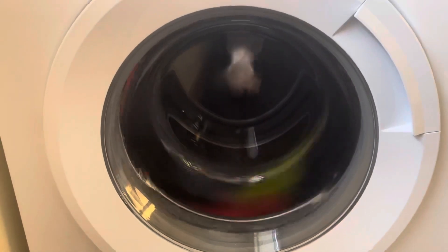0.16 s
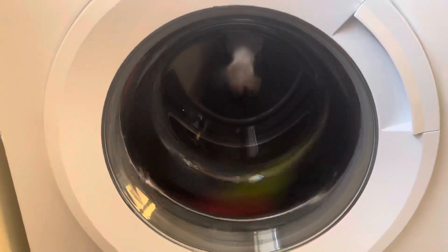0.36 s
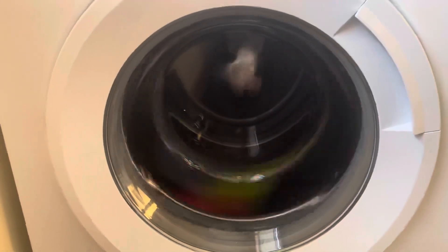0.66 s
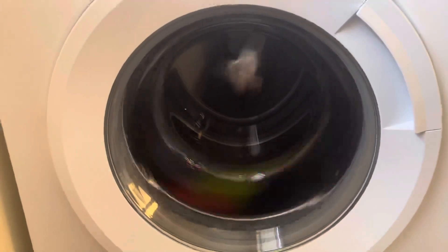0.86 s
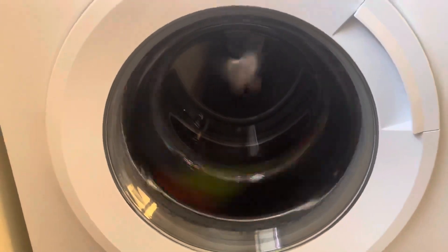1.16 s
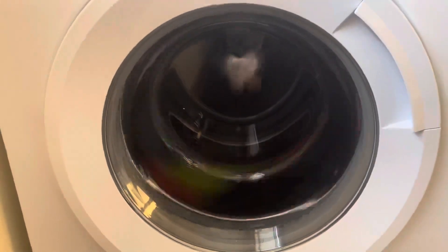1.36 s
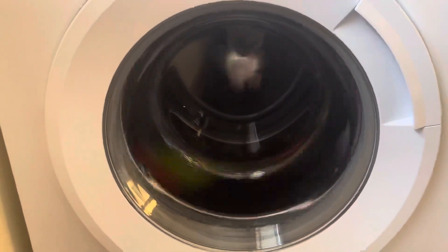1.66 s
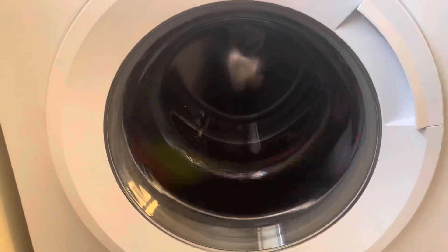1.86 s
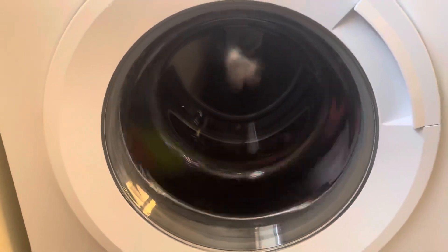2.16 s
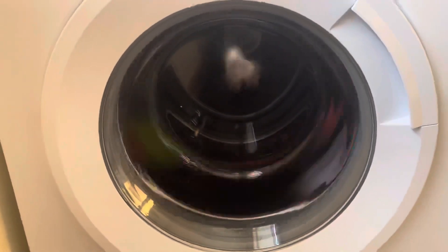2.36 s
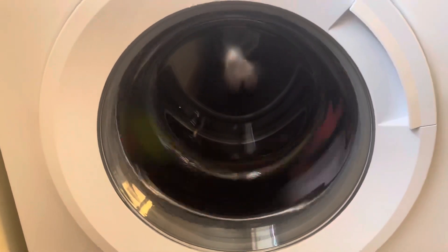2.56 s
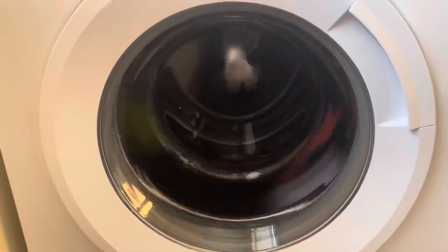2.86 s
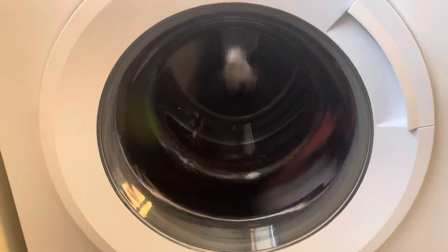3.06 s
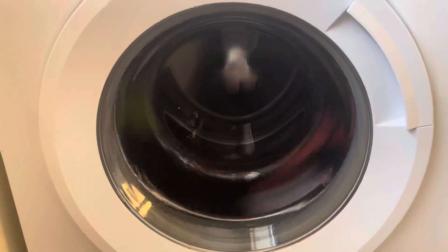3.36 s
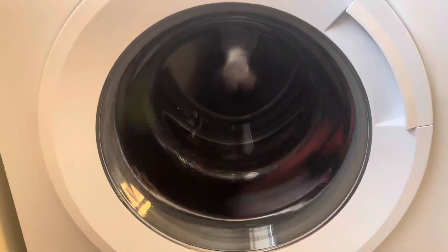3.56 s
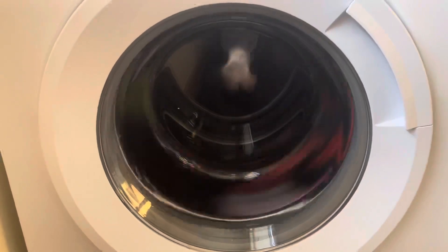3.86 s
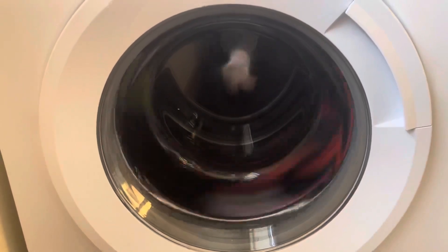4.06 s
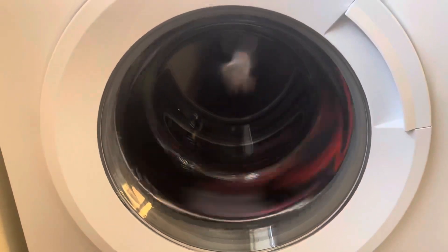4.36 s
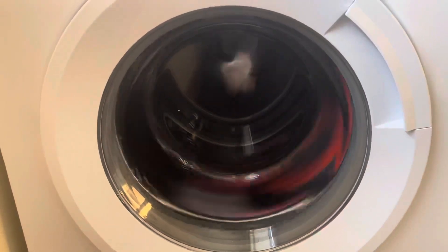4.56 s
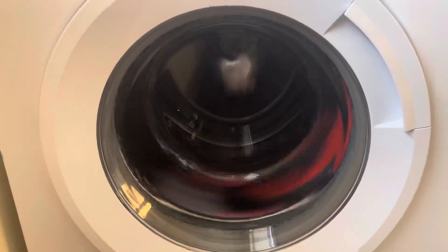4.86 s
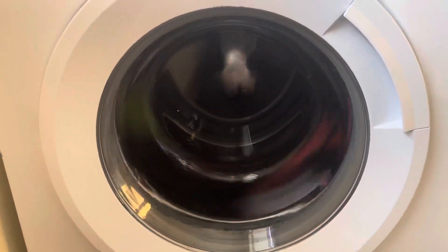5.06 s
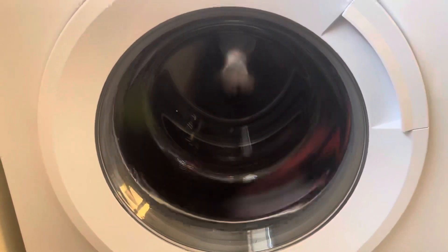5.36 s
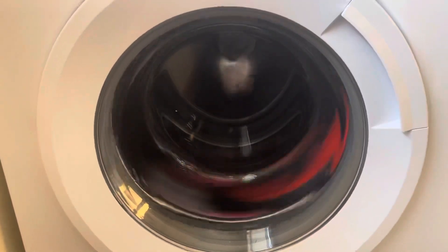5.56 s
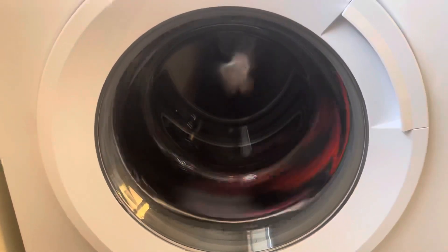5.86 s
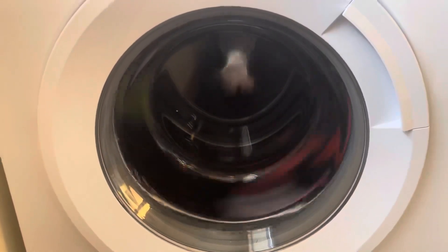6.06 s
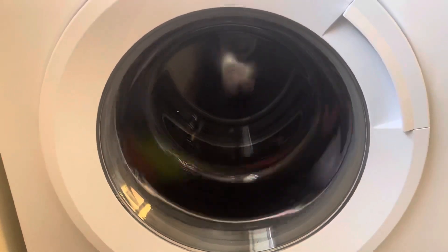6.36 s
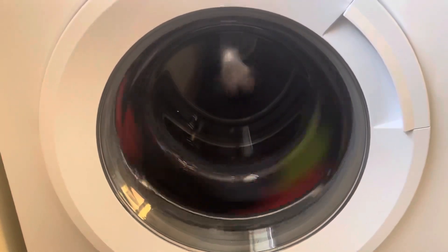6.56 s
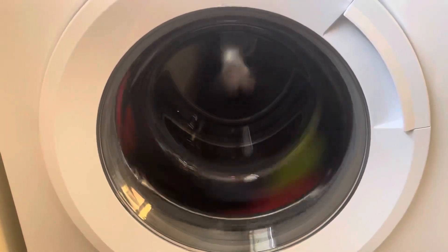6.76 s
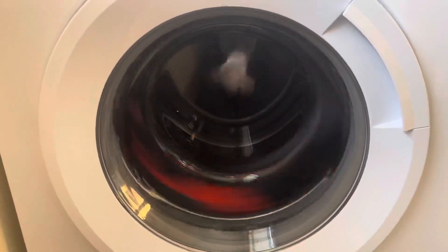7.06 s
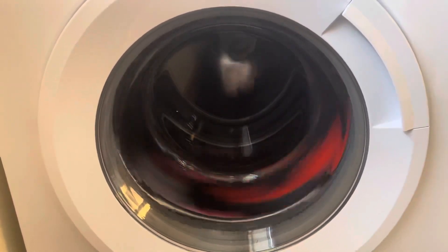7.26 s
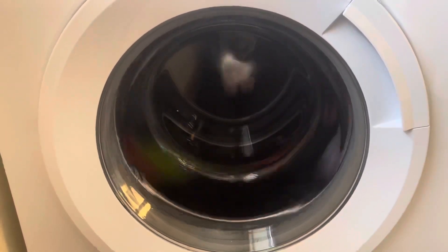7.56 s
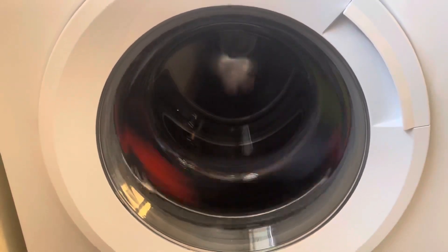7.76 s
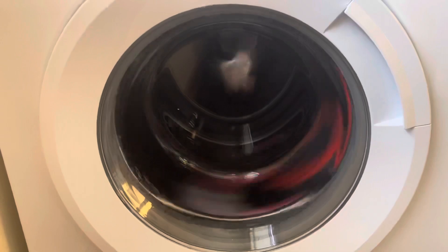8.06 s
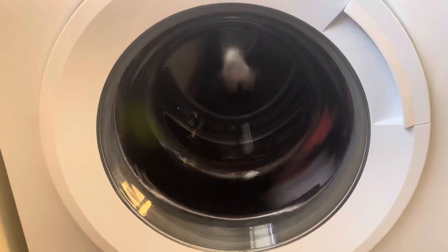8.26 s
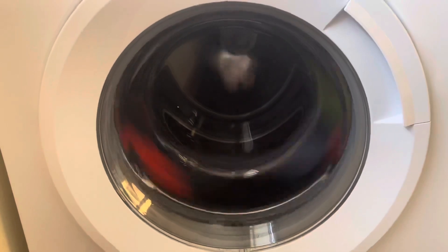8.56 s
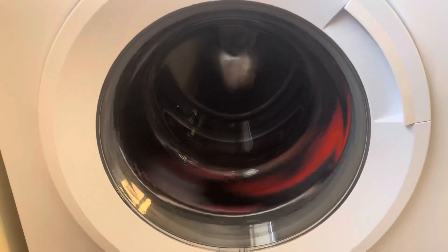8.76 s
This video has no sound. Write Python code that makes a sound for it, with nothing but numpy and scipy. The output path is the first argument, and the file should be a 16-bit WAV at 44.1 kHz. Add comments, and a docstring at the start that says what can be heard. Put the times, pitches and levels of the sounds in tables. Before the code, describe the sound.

Close to a front-loading washing machine in a small room, the drum spins at a steady fast rate with low throbbing hum, thin high motor whine and a rush of air and water. Something loose ticks, scrapes and clatters, most densely around two seconds. After about five seconds the motor eases and the pitch slides down while the hum continues.

```python
"""Washing machine losing spin speed

Heard close to the door of a front loader in a small room: about ten turns a second, then slowing.
The unbalanced drum and whining motor sum wandering tones on multiples of the drum rate; the pump hums
on the mains and rattles as filtered noise; air and water rush as noise that rings the panels.
Mostly in the first half, something loose skitters and clatters: bursts of tiny random clicks."""
import sys
import numpy as np
from scipy import signal
from scipy.fft import rfft, irfft
from scipy.io import wavfile

SR = 44100
rng = np.random.default_rng(int(sys.argv[2]) if len(sys.argv) > 2 else 0)


def store_pcm(level_fs):
    """Save levels as 16-bit WAV."""
    pcm = np.round(np.clip(level_fs, -1, 1) * 32767).astype(np.int16)
    wavfile.write(sys.argv[1], SR, np.atleast_2d(pcm).T)


N = 392931
T = np.arange(N) / SR  # time, s
HZ = np.maximum(np.arange(N // 2 + 1) * SR / N, 1)  # frequencies of the spectrum, Hz

MAINS_HZ = 50.02
BELT_RATIO = 6  # turns of the motor shaft for each turn of the drum
EASES_S, EASING_S = 5.2, .5  # the motor begins to ease off, and takes this long

# colour of the skittering and of the crack of a blow: (frequency [Hz], gain [dB])
CRACKLE_COLOUR = [(80, -36), (400, -7), (1200, 1), (2500, 0.5), (4500, -0.5), (6500, 0), (8500, 1),
                  (11300, 7), (12200, -3.5), (13000, -28)]


def drum(speed, angle, smear=.3, waver_db=1.5, count=58):
    """Every turn the load shoves the tub; springs smear the shove and its higher multiples wander."""
    # shake of the load: (multiple of the drum rate, level before the cabinet lifts it [dB])
    shake = [(3, -62), (4, -54.5), (5, -51.5), (6, -73), (7, -48.5), (8, -50.5), (9, -55.5), (10, -51),
             (11, -54), (12, -47.5), (13, -56.5), (14, -45.5), (15, -58.5), (16, -56.5), (17, -52),
             (18, -55), (21, -61.5), (22, -58), (23, -57), (24, -57.5), (25, -56.5), (26, -65.5), (29, -62),
             (30, -63), (31, -55), (32, -59.5), (33, -56), (35, -57), (37, -64), (41, -66), (42, -59),
             (43, -66), (60, -74)]
    # cabinet resonances that lift the shake as it passes: (frequency [Hz], width [Hz], gain [dB])
    cabinet = [(44.6, 1.4, 7.5), (78.5, 2.6, 4.5), (161, 12.5, -1), (378.4, 5.4, 8.5)]
    multiples, levels_db = np.transpose(shake)
    total = 0
    for k in np.arange(count) + 3:
        # the lift moves slowly: every hundredth sample is enough
        coarse_lift = 1 + np.abs(resonances(cabinet, k * speed[::100]))
        lift = np.interp(T, T[::100], coarse_lift)
        size = undb(np.interp(k, multiples, levels_db) + waver_db * walk(3)) * lift
        wander = (k / 28) ** 2 * walk(2)
        total = total + size * np.cos(k * angle + smear * k ** 2 + wander)
    return np.sqrt(2) * total


def motor(speed, angle, whine_order=350, ripple=0.13):
    """The whine and its multiples flutter with the belt and swell as they slide through resonances."""
    # how well the housing radiates the whine: (frequency [Hz], level [dB])
    housing = [(1690, -82), (1765, -61), (1900, -80), (2700, -76), (2885, -68), (2915, -58), (2960, -57.5),
               (2978, -69), (3010, -55), (3050, -54), (3075, -50), (3115, -50.5), (3140, -54), (3165, -61),
               (3195, -54), (3255, -66), (3280, -55), (3325, -54), (3355, -50), (3390, -49), (3425, -55),
               (3460, -61), (3495, -57), (3530, -57), (4300, -70), (4700, -66), (4900, -73), (5300, -70),
               (5780, -59), (5900, -64), (5950, -58.5), (6000, -63), (6250, -62.5), (6410, -62),
               (6480, -57.5), (6535, -65), (6590, -60), (6690, -67), (6730, -56), (6790, -57), (6850, -63),
               (6900, -56), (7000, -56), (7035, -62.5), (7060, -59.5), (8300, -72), (9700, -70),
               (10150, -68), (10600, -74), (11500, -68), (11720, -61), (11850, -70), (12500, -80),
               (13000, -79), (13600, -95)]
    # tones of the motor: (multiple of the whine, level over the housing's [dB])
    tones = [(.5, 0), (1, 0), (1.5, 0), (2, 0), (3, 0), (4, 0)]
    # side tones while the motor pulls: (multiple of the drum rate, level [dB])
    side_tones = [(330, -66), (356, -61.5)]
    flutter = .22 * walk(28) + .5 * walk(12) + .5 * walk(4)
    phase = whine_order * angle + flutter
    throb = 1 + ripple * np.cos(BELT_RATIO * angle) + ripple * np.cos(4 * np.pi * MAINS_HZ * T)
    whine = 0
    for k, db in tones:
        # the overtones flicker more deeply
        depth = min(k, 2)
        size = undb(db + 1.5 * depth * walk(16) - .5 * depth)
        whine = whine + response(housing, k * whine_order * speed) * size * np.cos(k * phase)
    pulling = 1 - eased() ** 2
    for order, db in side_tones:
        whine = whine + pulling * undb(db + 2 * walk(12)) * np.cos(order * angle + flutter)
    return np.sqrt(2) * whine * throb


def eased():
    """0 while the motor pulls, 1 once it has eased off."""
    return np.clip((T - EASES_S) / EASING_S, 0, 1)


def clatter(room_db=-7, wall_db=-0.5, note_width=0.22, clink_width=0.17):
    """Each blow is a dying flurry of contacts: a bright crack, a hollow wall knock and a thin clink."""
    # blows: (time [s], crack [dB], knock [dB], knock pitch [Hz], clink [dB], clink pitch [Hz], t60 [s])
    blows = [(.002, -41.5, -60, 1600, -49, 8500, 0.22), (.343, -42, -65, 1600, -47, 11300, 0.23),
             (.411, -44, -57, 1600, -50, 6040, 0.18), (.642, -42, -58, 1600, -54, 5500, .12),
             (.870, -39, -41, 1620, -46, 4500, 0.2), (1.021, -29, -55, 1600, -31, 8800, .05),
             (1.033, -36, -57, 1600, -43, 8600, .2), (1.258, -30, -58, 1600, -38, 11600, 0.048),
             (1.272, -38, -50, 1570, -47, 3840, .2), (1.824, -27.5, -31.5, 1706, -34, 3700, 0.2),
             (1.850, -37, -34, 1860, -47, 4000, 0.2), (1.880, -28.5, -29, 1910, -33, 2600, 0.2),
             (1.900, -38, -29.5, 1717, -43, 3700, 0.15), (1.931, -29, -35.5, 1693, -32, 8900, 0.19),
             (1.963, -30.5, -30, 2510, -37, 8000, 0.24), (2.007, -27, -40, 2090, -24, 6400, 0.2),
             (2.021, -26.5, -39, 2100, -29.5, 8500, 0.17), (2.040, -41, -42, 2120, -29, 6660, 0.11),
             (2.075, -34.5, -26, 1598, -44, 3260, 0.29), (2.116, -34.5, -33, 1660, -43, 4900, 0.52),
             (2.215, -27.5, -37.5, 1290, -34.5, 5960, 0.31), (2.292, -41, -30, 1897, -34.5, 5550, 0.29),
             (2.312, -45, -35.5, 2700, -46, 5830, 0.31), (2.459, -35.5, -56, 1610, -44, 5750, 0.26),
             (2.907, -44, -53, 1600, -46, 4200, .18), (3.171, -31, -56, 2210, -35, 11200, 0.37),
             (3.323, -31, -56, 1600, -40, 11300, 0.14), (4.166, -50, -62, 1600, -35, 10800, 0.12),
             (5.153, -44, -65, 1600, -45, 11800, .07)]
    # modes of the drum wall that every blow knocks on: (frequency [Hz], width [Hz], gain [dB])
    wall = [(600, 270, -4), (1210, 250, -7), (1720, 520, 4), (2480, 320, -8), (3350, 280, -23)]
    rise_share = 0.017  # rise time as a share of t60: a longer flurry takes longer to build
    size = SR // 2
    age = T[:size]
    cracks, knocks, notes = np.zeros((3, N))
    for start, crack_db, knock_db, knock_hz, clink_db, clink_hz, t60 in blows:
        rise = 1 - np.exp(-age / (rise_share * t60))
        force = rise * np.exp(-np.log(1000) * age / t60)
        contacts = grains(rate=6000, spread_db=2.5, size=size)
        span = slice(int(start * SR), int(start * SR) + size)
        cracks[span] += force * undb(crack_db) * grains(rate=3500, spread_db=2.5, size=size)
        knocks[span] += force * undb(knock_db + wall_db) * contacts
        # the pitch of the hollow note is set by where the blow lands
        notes[span] += force * undb(knock_db) * swoop(knock_hz, note_width, age)
        notes[span] += force * undb(clink_db) * ringing(contacts, clink_hz, clink_width)
    bright = shape(cracks, unit(response(CRACKLE_COLOUR, HZ)))
    hollow = shape(knocks, unit(resonances(wall, HZ)))
    blows_heard = bright + hollow + notes
    return blows_heard + undb(room_db) * echoes(blows_heard, t60=0.55)


def swoop(hz, width, age, depth=0.303, settle_s=0.00493):
    """A resonance that slides up to its pitch as the contact settles; depth and width are shares of it."""
    pitch = hz * (1 - depth * np.exp(-age / settle_s))
    # slow noise on two axes spreads the tone into a band
    lowpass = signal.butter(2, hz * width / 2, fs=SR, output="sos")
    sway = signal.sosfilt(lowpass, rng.standard_normal((2, len(age))))
    carrier = np.exp(2j * np.pi * np.cumsum(pitch) / SR)
    return unit(np.real((sway[0] + 1j * sway[1]) * carrier))


def ringing(x, hz, width):
    """Ring a broad resonance, width as a share of its centre; rms 1."""
    edges = np.minimum([hz / (1 + width / 2), hz * (1 + width / 2)], .45 * SR)
    return unit(signal.sosfilt(signal.butter(2, edges, "bandpass", fs=SR, output="sos"), x))


def skitter(level_db=2.0, room_db=-6):
    """Something loose slides and scratches, catching unevenly: a dense run of tiny clicks."""
    # slides of the loose thing: (start [s], length [s], level before level_db is added [dB])
    slides = [(0.633, 0.11, -47), (0.74, 0.09, -44), (0.857, 0.2, -43.5), (1.142, 0.19, -45),
              (2.48, .08, -43), (3.154, 0.17, -40.5), (3.978, 0.11, -48.5), (4.142, 0.12, -46.5),
              (4.354, 0.037, -59)]
    catching = undb(1.3 * walk(30))
    size = catching * sum(slide(*row) for row in slides)
    scratch = unit(shape(grains(rate=1500, spread_db=-0.5), response(CRACKLE_COLOUR, HZ)))
    clicks = scratch * size * undb(level_db)
    return clicks + undb(room_db) * echoes(clicks, t60=0.059)


def slide(start, length, db, attack_s=0.0099, release_db_per_s=145):
    """Force of one slide: it grips quickly, holds, then dies away."""
    age = np.maximum(T - start, 0)
    grip = 1 - np.exp(-age / attack_s)
    return grip * undb(db - release_db_per_s * np.maximum(age - length, 0))


def hum(waver_db=1.3, drone_hz=56.5, drone_db=-52.5):
    """The pump hums on mains multiples, rebalanced as the motor eases; a buzz wavers over a low drone."""
    # pump hum: (multiple of the mains, level [dB], change once the motor has eased off [dB])
    hum_lines = [(2, -41, 0.5), (4, -56.5, -9), (5, -57.5, -4.5), (9, -58, -4.5), (12, -57.5, -1),
                 (14, -63, 7), (16, -57, -6), (19, -61, -3), (25, -56.5, -2)]
    # level of the buzz at six times the mains: (time [s], level [dB])
    buzz_level = [(0.0, -44), (2.98, -45.5), (3.15, -57), (3.38, -42), (5.36, -42), (5.44, -46.5),
                  (8.51, -45), (8.91, -54)]
    mains = 2 * np.pi * MAINS_HZ * T
    lines = 0
    for k, db, change_db in hum_lines:
        # the higher lines waver more
        waver = min(1 + k / 8, 2.8) * walk(6)
        size = undb(db + change_db * eased() + waver)
        lines = lines + size * np.cos(round(k) * mains + .03 * k * walk(6))
    buzz_size = undb(curve(buzz_level) + waver_db * walk(14))
    buzz = buzz_size * np.cos(6 * mains + .25 * walk(9))
    drone = undb(drone_db) * np.cos(2 * np.pi * drone_hz * T)
    return np.sqrt(2) * (lines + buzz + drone)


def rattle(angle, level_db=-54.0, throb=0.37):
    """Brief gulps of air in the impeller rattle the pump housing, which throbs with the motor shaft."""
    # rattle of the pump housing: (frequency [Hz], width [Hz], gain [dB])
    housing_modes = [(2637, 52, 8.5), (3233, 250, 6.5), (4130, 110, 1.5)]
    gulp = np.exp(-T[:SR // 50] / .0025)  # dies away over a few milliseconds
    force = signal.fftconvolve(np.abs(grains(rate=260, spread_db=1.2)), gulp)[:N]
    force = force * (1 + throb * np.cos(BELT_RATIO * angle))
    noise = force * rng.standard_normal(N)
    return undb(level_db) * unit(shape(noise, resonances(housing_modes, HZ)))


def rush(speed, angle, pulsing=0.056, lurch=0.018):
    """The tub rumbles; air and water hiss, pulsing at twice the mains and each turn; panels ring to all."""
    # rumble of the tub: (frequency [Hz], level in 1 Hz before the panels [dB])
    rumble_colour = [(24, -102), (46, -78), (64, -64.5), (80, -63), (110, -55.5), (138, -66), (200, -65.5),
                     (280, -63), (320, -63.5), (378, -63), (415, -74), (560, -73), (700, -75.5),
                     (1200, -78), (1600, -92.5), (4000, -110)]
    # hiss of air and water: (frequency [Hz], level in 1 Hz before flow and panels [dB])
    hiss_colour = [(500, -90), (1100, -80.5), (1550, -83.5), (2150, -82), (2850, -87), (3250, -81.5),
                   (3800, -89), (5000, -96), (6800, -96.5), (7500, -98), (9000, -98.5), (11200, -91.5),
                   (12000, -100.5), (12800, -120)]
    # water flung on the tub wall: (frequency [Hz], width [Hz], level in 1 Hz before flow and panels [dB])
    wash_modes = [(1527, 390, -83.5), (3510, 90, -93)]
    # resonances of the steel panels, over the plain rush: (frequency [Hz], width [Hz], gain [dB])
    panel_modes = [(355.3, 6.6, 3), (381.3, 6.2, 3.5), (459, 17, 4.5), (524.5, 14, 5.5), (581, 12.6, 7),
                   (620, 21, -7), (686, 19, 7), (734, 12, -4), (783, 15, 6.5), (936, 22, 3.5),
                   (1078, 62, 5), (1184, 60, 0), (1383, 14, 2.5), (1488, 26, 5), (1540, 17, 4.5),
                   (1673, 18, 5.5), (2006, 76, 0.5), (2683, 41, 5)]
    white = rng.standard_normal((3, N)) * np.sqrt(SR / 2)
    flow_db = flow(speed)
    rumble = shape(white[0], response(rumble_colour, HZ)) * undb(0.82 * walk(12))
    hiss = shape(white[1], response(hiss_colour, HZ)) * undb(flow_db + 0.91 * walk(25))
    hiss *= 1 + pulsing * np.cos(4 * np.pi * MAINS_HZ * T) + lurch * np.cos(angle)
    # the wash dies away faster than the hiss as the flow falls
    wash = shape(white[2], resonances(wash_modes, HZ)) * undb(3 * flow_db + 1.5 * walk(9))
    panels = np.sqrt(1 + sum(np.abs(resonances([mode], HZ)) ** 2 for mode in panel_modes))
    sound = shape(rumble + hiss + wash, panels)
    # the room adds a fine ripple above the bass
    share = .12 * HZ ** 2 / (HZ ** 2 + 700 ** 2)
    direct = shape(sound, np.sqrt(1 - share))
    return direct + shape(echoes(sound, t60=0.097), np.sqrt(share))


def flow(speed, start_db=2.5, drying_db_per_s=0.28, db_per_turn_rate=1):
    """Strength of the rush in dB: less water is flung out as time passes and as the drum slows."""
    return start_db - drying_db_per_s * T + db_per_turn_rate * (speed - speed[0])


def undb(db):
    """Decibels to gain."""
    return 10 ** (np.asarray(db) / 20)


def unit(x):
    """Scale to rms 1."""
    return x / np.sqrt(np.mean(np.abs(x) ** 2))


def curve(rows):
    """Join (s, value) rows by straight lines."""
    return np.interp(T, *np.transpose(rows))


def response(rows, hz):
    """Gain of a (Hz, dB) spectrum at the given frequencies."""
    f, db = np.transpose(rows)[:2]
    return undb(np.interp(np.log(hz), np.log(f), db))


def resonances(modes, hz):
    """Complex gain of (Hz, width, dB) modes."""
    return sum(undb(db) / (1 + 1j * (hz ** 2 - f ** 2) / (hz * w)) for f, w, db in modes)


def shape(x, gain):
    """Filter by a gain over frequency."""
    return irfft(rfft(x) * gain, N)


def walk(rate):
    """Smooth chance that changes about rate times a second; spread near 1."""
    points = signal.resample_poly(rng.standard_normal(int(N / SR * rate) + 3), 8, 1)
    return np.interp(T * rate * 8, np.arange(len(points)), points)


def grains(rate, spread_db, size=N):
    """Random tiny impacts, about rate a second, of unequal size and either sign; rms 1."""
    hit = rng.random(size) < rate / SR
    sign = rng.choice([-1, 1], size)
    return unit(hit * sign * undb(spread_db * np.minimum(rng.standard_normal(size), 2)))


def echoes(x, t60):
    """Dense reflections that die away by 60 dB in t60 seconds."""
    tail = rng.standard_normal(SR // 2) * np.exp(-np.log(1000) * T[:SR // 2] / t60)
    return signal.fftconvolve(x, tail / np.linalg.norm(tail))[:N]


def scene():
    """Shake and hum come from straight ahead, rush and clatter from all round; walls spread the rest."""
    # drum speed: (time [s], rate [turns per second])
    drum_speed = [(0, 10.083), (1.7, 10.085), (3.1, 10.05), (4.2, 10.085), (5.05, 10.097), (6, 9.606),
                  (7.45, 8.9), (8.91, 8.206)]
    # stereo width, narrow bass, wide middle, uneven treble: (frequency [Hz], side minus mid [dB])
    stereo_width = [(30, -40), (126, -9.5), (282, -10.5), (600, -3.5), (1740, -2), (3270, -8.5),
                    (5200, -4.5), (6500, -6.5), (7450, -5.5), (8650, -13), (9200, -15), (10200, -44),
                    (11100, -11), (12200, -20)]
    speed = curve(drum_speed)
    angle = 2 * np.pi * np.cumsum(speed) / SR
    bright = motor(speed, angle) + rattle(angle)
    # two independent draws of the same sources fill mid and side
    ahead, around = (rush(speed, angle) + skitter() + clatter() for _ in range(2))
    mid = drum(speed, angle) + hum() + bright + ahead
    side = shape(around + echoes(bright, t60=0.1), response(stereo_width, HZ))
    return np.array([mid + side, mid - side])


def record(dry, top_hz=12900):
    """Left and right differ in level and phase by frequency; the top is cut."""
    # left channel relative to the right: (frequency [Hz], phase lead [rad], level [dB])
    left_lead = [(30, 0, 0), (126, 0, 1.7), (600, 0, 3), (1200, 0, 2), (1650, -1, 2.5), (2100, 0, 2),
                 (2900, .8, 2), (4300, .5, 3.5), (5400, .6, 5), (6900, .2, 4), (7600, .8, 2),
                 (8300, .3, .3), (8650, 0, 0), (9000, -.4, 0), (9900, -2.8, 0), (10200, -3.14, 0),
                 (10450, -3.4, 0), (11100, -4.5, 0), (11750, -6.15, 0), (12200, -6.28, 0)]
    hz, radians, db = np.transpose(left_lead)
    # half of the difference goes to each channel
    lean = undb(np.interp(HZ, hz, db) / 2) * np.exp(.5j * np.interp(HZ, hz, radians))
    channels = np.array([shape(dry[0], lean), shape(dry[1], 1 / lean)])
    return signal.sosfilt(signal.ellip(8, .2, 70, top_hz, fs=SR, output="sos"), channels)


dry = scene()
out = record(dry)
store_pcm(out)
```